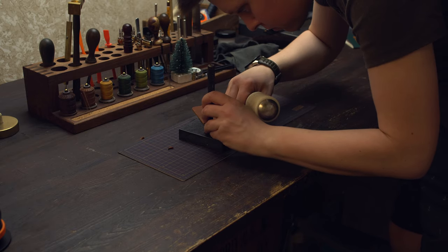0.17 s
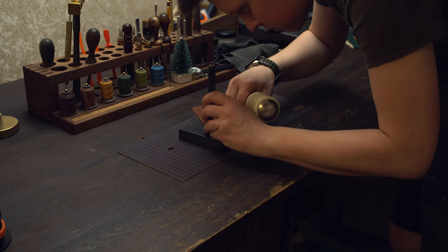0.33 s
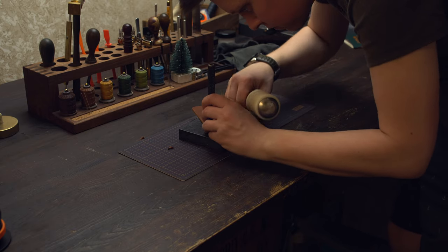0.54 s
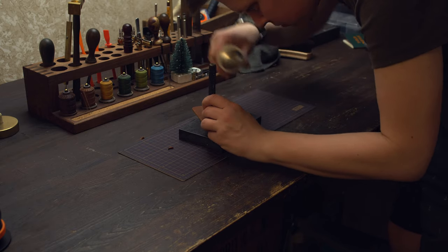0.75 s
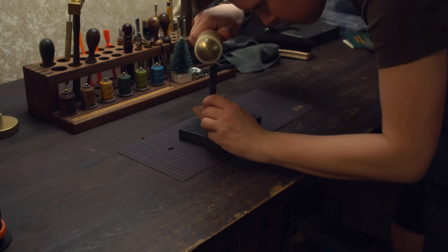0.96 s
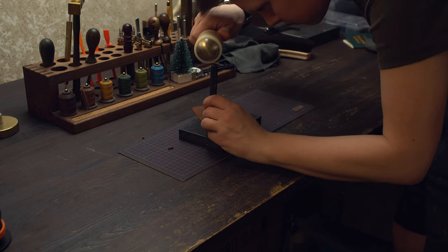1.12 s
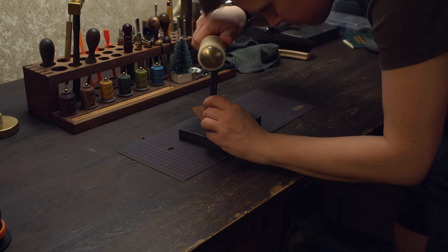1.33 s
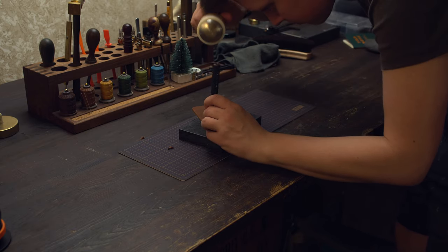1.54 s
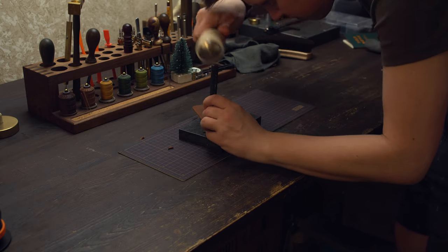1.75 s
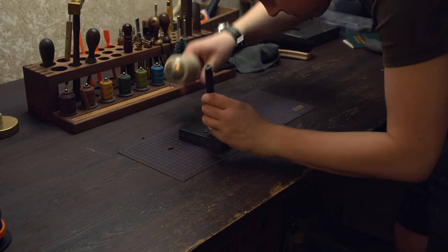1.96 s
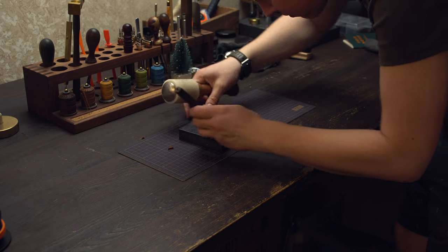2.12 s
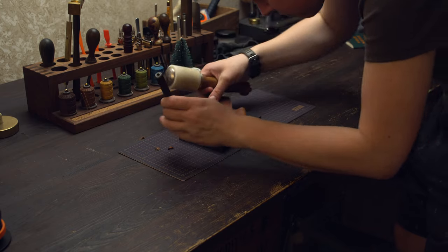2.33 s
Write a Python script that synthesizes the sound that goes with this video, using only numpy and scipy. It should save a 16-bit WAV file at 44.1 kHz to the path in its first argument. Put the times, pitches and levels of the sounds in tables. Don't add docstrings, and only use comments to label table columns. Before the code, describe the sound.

A mallet strikes a steel punch set on leather over a hard block. Low ventilation hum and faint hiss throughout; slight sleeve rustles and a tiny tick from 0.5 s, a thin distant squeak near 0.8 s. A light woody tap at 1.37 s, a small tick, then a hard, overloaded crack at 1.72 s with bench thump, short room echo and ringing tools. Rustles and ticks from 2 s.

```python
import sys
import numpy as np
from scipy import signal
from scipy.fft import rfft, irfft, next_fast_len
from scipy.io import wavfile
from scipy.ndimage import uniform_filter1d

SR = 44100
rng = np.random.default_rng(int(sys.argv[2]) if len(sys.argv) > 2 else 0)


def voltage_ratio(level):
    return 10 ** (np.asarray(level, float) / 20)


def log_audio(samples):
    frames = np.atleast_2d(samples).T
    limited = np.clip(frames, -1, 1)
    pcm = np.round(limited * 32767).astype(np.int16)
    wavfile.write(sys.argv[1], SR, pcm)


N = 109809
T, M = np.arange(N) / SR, next_fast_len(N)
HZ = np.arange(M // 2 + 1) * SR / M + 1e-3


def unit(x):
    return x / np.sqrt(np.mean(x ** 2))


def unit_energy(x):
    return x / np.sqrt(np.sum(x ** 2))


def band(x, hz, octaves):
    bell = np.exp(-.5 * (np.log2(HZ / hz) / octaves) ** 2)
    return irfft(rfft(x, M) * bell, M)[:N]


def colour(x, points):
    table = np.array(points)
    log_gain = np.interp(np.log(HZ), np.log(table[:, 0]), table[:, 1]) * np.log(10) / 20
    cepstrum = irfft(log_gain, M)
    cepstrum[1:M // 2] *= 2
    cepstrum[M // 2 + 1:] = 0
    return irfft(rfft(x, M) * np.exp(rfft(cepstrum)), M)[:N]


def walk(rate):
    k = int(SR / rate)
    return unit(uniform_filter1d(uniform_filter1d(rng.standard_normal(N), k), k))


def progress(at, length):
    return np.clip((T - at) / length, 0, 1)


def push(at, ms):
    p = np.sin(np.pi * progress(at, ms / 1000)) ** 2
    return p / p.sum()


def burst(at, ms):
    u = np.maximum(T - at, 0) / (ms / 1000)
    return rng.standard_normal(N) * (1 - np.exp(-u / 0.1)) * np.exp(-u)


def ring(modes, rise):
    out = 0
    for k, (hz, db, t60) in enumerate(modes):
        out = out + (-1) ** k * voltage_ratio(db - 60 * T / t60) * np.sin(2 * np.pi * hz * T)
    return (1 - np.exp(-T / rise)) * out


def after(x, response):
    return signal.fftconvolve(x, response)[:N]


# pitch_hz [Hz], level_db [dB per Hz]
HUM = [(7.1, -28.5), (12, 3), (59, -10), (76, -22.5), (179, -20.5), (211, -23.5), (291, -23.5),
       (624, -20.5), (3000, -41), (3900, -69), (6600, -120)]
# pitch_hz [Hz], level_db [dB per Hz]
HISS = [(1760, -33.5), (3000, -0.5), (3300, -0.5), (4470, -4), (7850, -9), (8680, -4), (12400, -10.5),
        (16100, -39), (22000, -120)]
# pitch_hz [Hz], level_db [dB rms]
HUM_LINES = [(177.6, -83), (349.9, -84.5), (646.0, -81), (775.2, -85.5), (1394, -90.5)]


def hum():
    flicker_db, wobble_db = -2.15, 0.5
    noise = 0
    for hz in 14 * 2 ** np.arange(0, 10.5, .5):
        noise = noise + band(rng.standard_normal(N), hz, 0.31) * voltage_ratio(flicker_db * walk(6))
    out = voltage_ratio(-64.5) * unit(colour(noise, HUM)) + voltage_ratio(-84) * unit(colour(noise, HISS))
    for hz, db in HUM_LINES:
        level = np.sqrt(2) * voltage_ratio(db + wobble_db * walk(5))
        out = out + level * np.sin(2 * np.pi * hz * T + 0.27 * walk(4))
    return out


RUSTLE_S = [.515, .59, .592, .77, 1.46, 1.95, 1.96, 2.06, 2.22, 2.245, 2.25, 2.3, 2.31, 2.33]
# length_s [s], level_db [dB], pitch_hz [Hz], width [octaves]
RUSTLES = [(0.095, -75, 4000, 0.88), (0.081, -72, 6400, 1.2), (.05, -75.5, 8700, 0.091),
           (.17, -77, 7200, 0.88), (0.086, -69, 4000, .9), (0.54, -83, 8600, 0.09), (0.14, -75.5, 7200, .6),
           (0.37, -79.5, 4600, 0.73), (0.11, -70.5, 19000, .25), (0.094, -64.5, 1900, 2.9),
           (0.089, -59.5, 113, 0.15), (.3, -79, 8500, 0.086), (.3, -76, 12000, 0.84),
           (0.28, -74, 3050, 0.85)]


def rustles():
    grain_db, grains_per_s = 1.5, 870
    out = 0
    for at, (length, db, hz, octaves) in zip(RUSTLE_S, RUSTLES):
        swell = np.sin(np.pi * progress(at, length) ** 0.47)
        grain = voltage_ratio(grain_db * walk(grains_per_s))
        out = out + voltage_ratio(db) * swell * unit(band(rng.standard_normal(N), hz, octaves)) * grain
    return out


# start_s [s], level_db [dB], pitch_hz [Hz]
TICKS = [
    (0.5242, -60, 4370),
    (1.484, -48, 3430),
    (2.268, -49.5, 3250),
    (2.3386, -48, 2800),
]


def ticks():
    out = 0
    for at, db, hz in TICKS:
        out = out + voltage_ratio(db) * band(burst(at, 4.0), hz, .6) * (T > at)
    return out


# start_s [s], length_s [s], level_db [dB], pitch_hz at start [Hz], pitch_hz at end [Hz]
SQUEAKS = [
    (.72, .12, -81, 2600, 2440),
    (.82, .085, -82, 2520, 2720),
]


def squeaks():
    out = 0
    for at, length, db, hz0, hz1 in SQUEAKS:
        u = progress(at, length)
        hz = (hz0 + (hz1 - hz0) * u) * (1 + 0.023 * walk(230))
        level = voltage_ratio(db + 2.6 * walk(60)) * np.sqrt(np.sin(np.pi * u) + 1e-12)
        out = out + level * np.sin(2 * np.pi * np.cumsum(hz) / SR)
    return out


# start_s [s], level_db of force [dB], contact_ms [ms]
BLOWS = [
    (1.3664, -17.5, .9),
    (1.7178, 4, .3),
]
CRACK_DB = [-15, -3]
CRACK_MS = [8.4, 4.4]
# pitch_hz [Hz], level_db [dB]
CRACKS = [
    [(800, -8.5), (1600, 2.5), (2800, -4), (4500, -11.5), (8000, -12), (11000, -25), (14000, -31)],
    [(800, -6), (1800, 6.5), (3500, 0.5), (6000, -7.5), (9000, -16.5), (12000, -27.5), (15500, -26.5)],
]
SNAP_DB = [18.5, 19]


def crack_tone(k):
    return [(200, -46), *CRACKS[k]]


def cracks():
    out = 0
    for k, (at, db, _) in enumerate(BLOWS):
        out = out + voltage_ratio(db + CRACK_DB[k]) * colour(burst(at, CRACK_MS[k]), crack_tone(k))
    return out


def snaps():
    out = 0
    for k, (at, db, _) in enumerate(BLOWS):
        out = out + voltage_ratio(db + CRACK_DB[k] + SNAP_DB[k]) * colour(push(at, 0.071), crack_tone(k))
    return out


# pitch_hz [Hz], level_db [dB], t60_s [s]
THUMP = [(251, 1, .025)]
THUMP_DB = [4.5, -14]
# pitch_hz [Hz], level_db [dB], t60_s [s]
BENCH = [(121.4, -11, 0.23), (133.7, -8, 0.22), (169.4, -21, 0.32), (204.1, -12, 0.27), (212.66, -12, 0.29),
         (240, -16, 0.3), (315.6, -20, 0.35), (388.6, -22.5, 0.24), (515.5, -23.5, .18), (745, -23.5, 0.23)]
BENCH_DB = [6, -3]
# pitch_hz [Hz], level_db [dB], t60_s [s]
SWAY = [(16, -29, 0.62), (41.2, -29.5, 0.46), (61.2, -32.5, 0.81), (80, -34, 0.53)]
SWAY_DB = [10.5, 2]


def bench():
    out = 0
    for k, (at, db, contact_ms) in enumerate(BLOWS):
        wood = voltage_ratio(THUMP_DB[k]) * ring(THUMP, .0004)
        wood = wood + voltage_ratio(BENCH_DB[k]) * ring(BENCH, 0.0022)
        wood = wood + voltage_ratio(SWAY_DB[k]) * ring(SWAY, 0.13)
        out = out + voltage_ratio(db) * after(push(at, contact_ms), wood)
    return out


# pitch_hz [Hz], level_db [dB], t60_s [s]
SHELF = [(382, -63, 3.6), (588, -61, 2.2), (976, -48, 1.2), (1130, -44, .8), (1228, -25, .6),
         (1260, -35, .65), (1281, -45, 1.0), (1318, -49, 1.3), (1337, -32, .5), (1519, -38, .6),
         (1558, -44, .8), (1970, -52, .95), (2062, -49, .8), (2223, -52, .7)]
SHELF_DB = [-34, 0]
# pitch_hz [Hz], level_db [dB], t60_s [s]
RACK = [(131, -46, 1.2), (168, -40, .9), (204, -44, .9), (312, -45, .8)]
RACK_DB = [-12, 0]


def shelf():
    wobble_db = 1.5
    out = 0
    for k, (at, _, _) in enumerate(BLOWS):
        tools = voltage_ratio(SHELF_DB[k] + wobble_db * walk(15)) * ring(SHELF, .02)
        rack = voltage_ratio(RACK_DB[k]) * ring(RACK, .05)
        out = out + after(push(at, .1), tools + rack)
    return out


# pitch_hz [Hz], level_db [dB], t60_s [s]
KNOCKS = [
    [(964, 3, 0.015), (520, -9, 0.019), (1166, -10, 0.016), (720, -8, 0.012)],
    [(1379.7, 9.5, 0.015), (1035, 3.5, 0.015), (723, -2, 0.012), (3333, -15.5, .012), (6280, -20.5, .01),
     (522, -6.5, 0.012), (848, -7.5, 0.027)],
]
KNOCK_LAG_S = [.0022, .0008]
KNOCK_RISE_S = [0.00074, 0.00073]


def knocks():
    out = 0
    for k, (at, db, _) in enumerate(BLOWS):
        hit = push(at + KNOCK_LAG_S[k], 0.13)
        out = out + voltage_ratio(db) * after(hit, ring(KNOCKS[k], KNOCK_RISE_S[k]))
    return out


# delay_s [s], level_db [dB]
ECHOES = [(.0055, -14.5), (0.0153, -12), (0.02, -13.5), (0.0256, -16.5), (.033, -7.5), (0.051, -13.5)]


def echoes():
    return sum(voltage_ratio(db) * push(lag, 0.19) for lag, db in ECHOES)


# pitch_hz [Hz], level_db [dB], t60_s [s]
ROOM = [(100, -2.5, .25), (250, 10, 0.21), (600, 4, 0.33), (1300, 1, 0.27), (2500, 4, 0.35),
        (5000, 3.5, .32), (9000, 2.5, .3), (14000, 2, 0.47)]


def room_tail():
    rise_s, late_t60_s = 0.0082, .55
    table, noise, tail = np.array(ROOM), rng.standard_normal(N), 0
    for hz in 60 * 2 ** np.arange(0, 8.3, .5):
        db, t60 = (np.interp(np.log(hz), np.log(table[:, 0]), table[:, c]) for c in (1, 2))
        tail = tail + band(noise, hz, 0.25) * voltage_ratio(db - 60 * T / t60)
    tail = tail * (1 - np.exp(-(T / rise_s) ** 2))
    late = band(rng.standard_normal(N), 2600, 1.3) * voltage_ratio(-60 * T / late_t60_s)
    late = late * (1 - np.exp(-T / 0.018))
    return voltage_ratio(-1.5) * unit_energy(tail) + voltage_ratio(-25.5) * unit_energy(late)


def scene():
    handling = rustles() + ticks() + squeaks()
    body = cracks() + bench() + shelf()
    knock = knocks()
    to_room = knock + snaps() + 0.15 * body + 0.26 * handling
    wet = after(to_room, room_tail()) + after(knock, echoes())
    return (knock + body + handling + wet + hum())[None]


def top_cut(x):
    return signal.sosfilt(signal.butter(12, 15780, fs=SR, output="sos"), x)


def record(dry):
    knee = 30.0
    x = dry / (1 + np.abs(dry) ** knee) ** (1 / knee)
    x = signal.sosfilt(signal.ellip(6, .2, 25, 15750, fs=SR, output="sos"), x)
    return top_cut(x)


dry = scene()
out = record(dry)
log_audio(out)
```